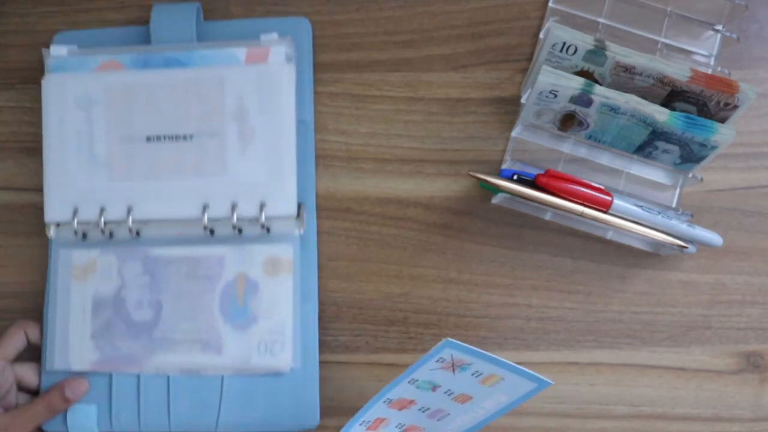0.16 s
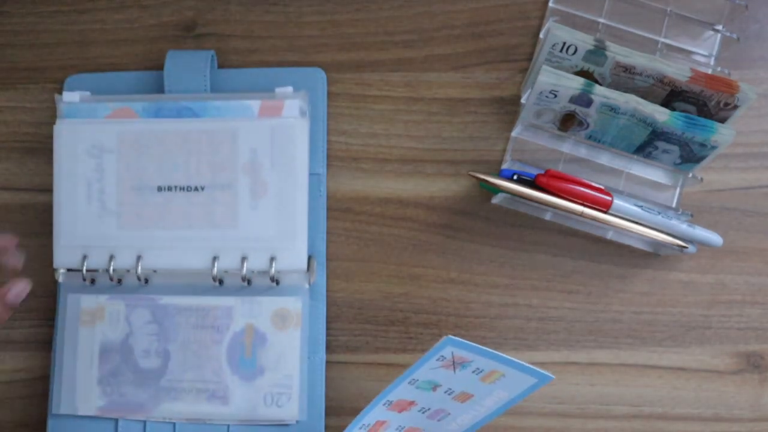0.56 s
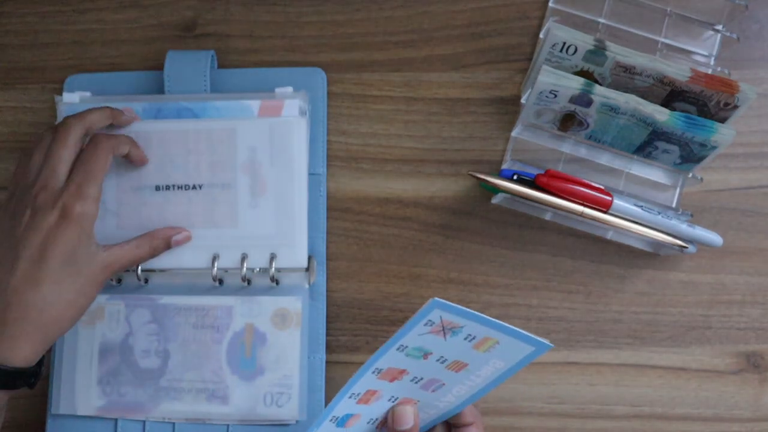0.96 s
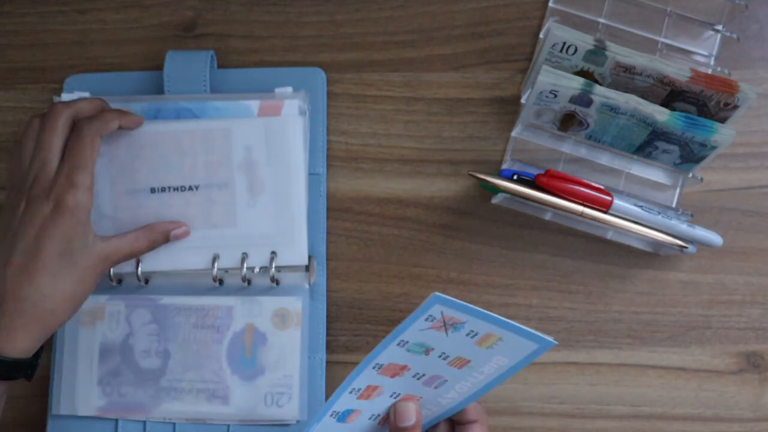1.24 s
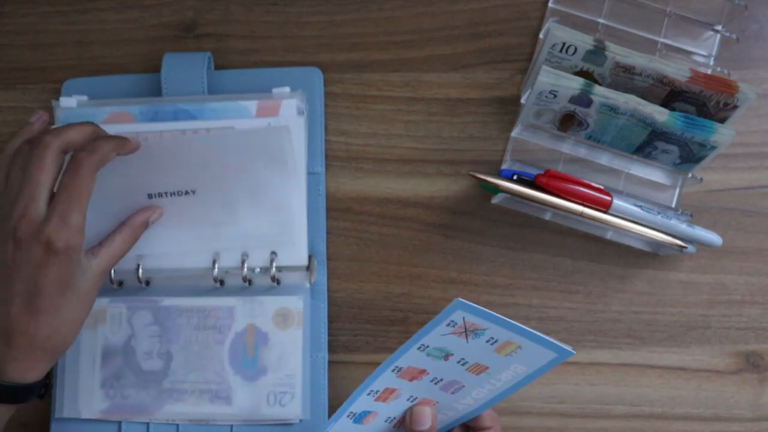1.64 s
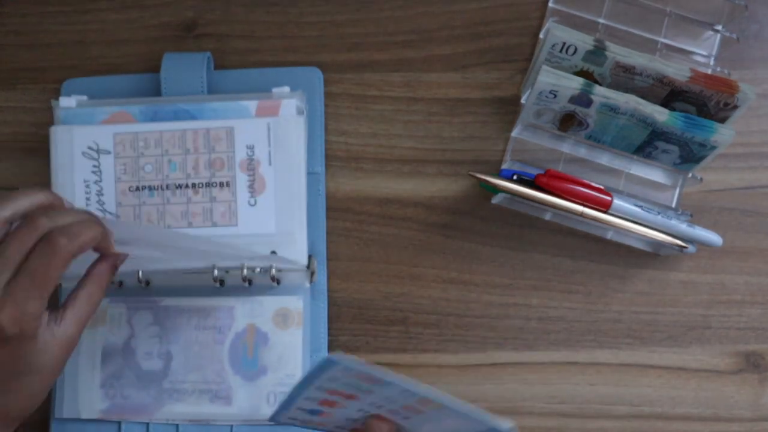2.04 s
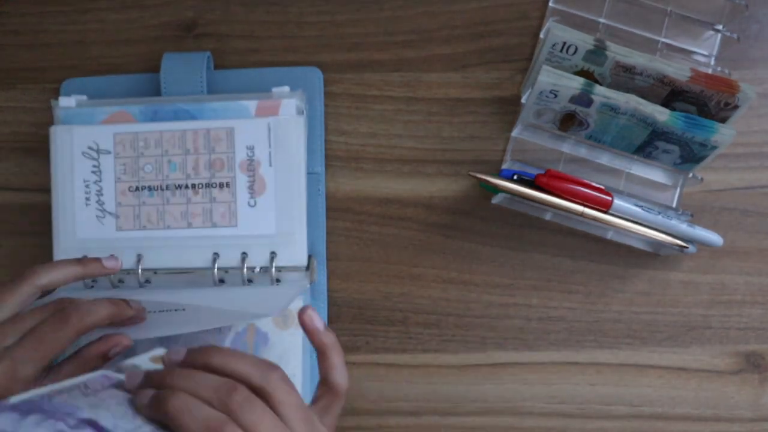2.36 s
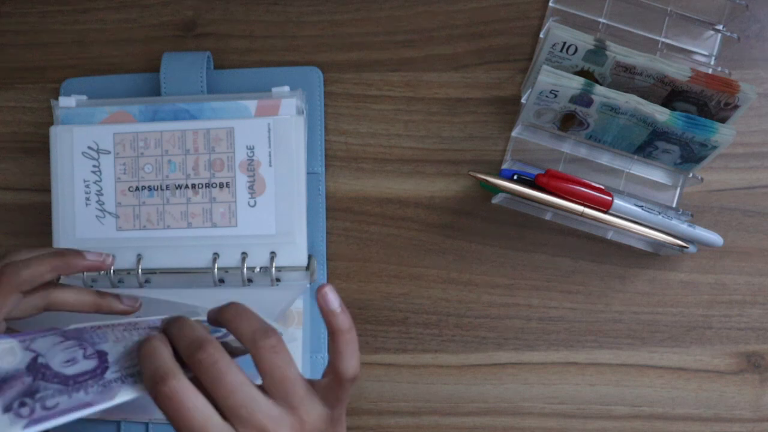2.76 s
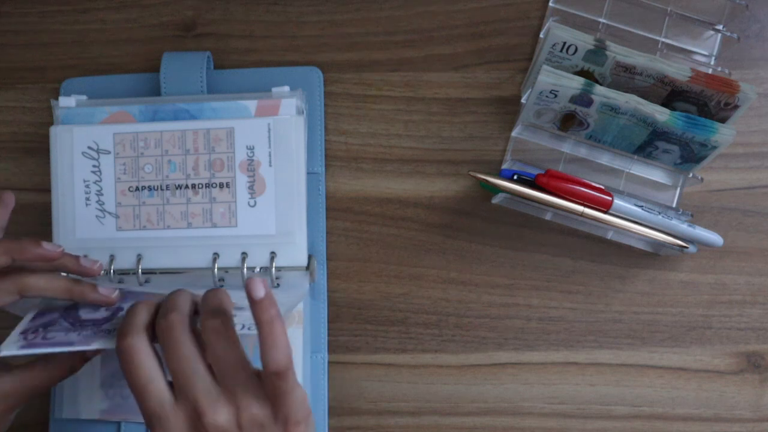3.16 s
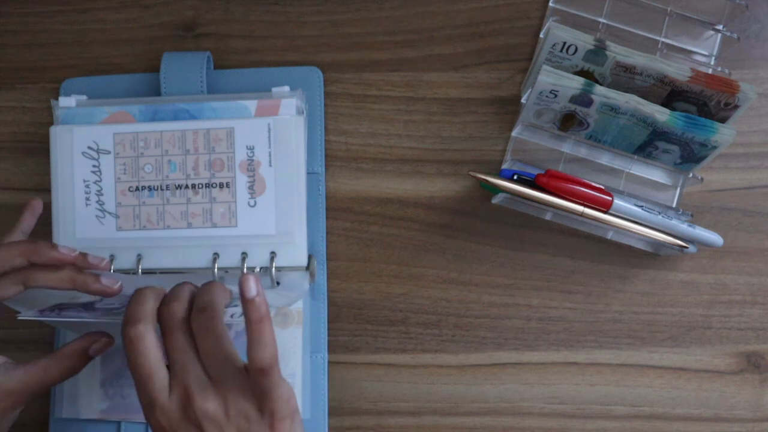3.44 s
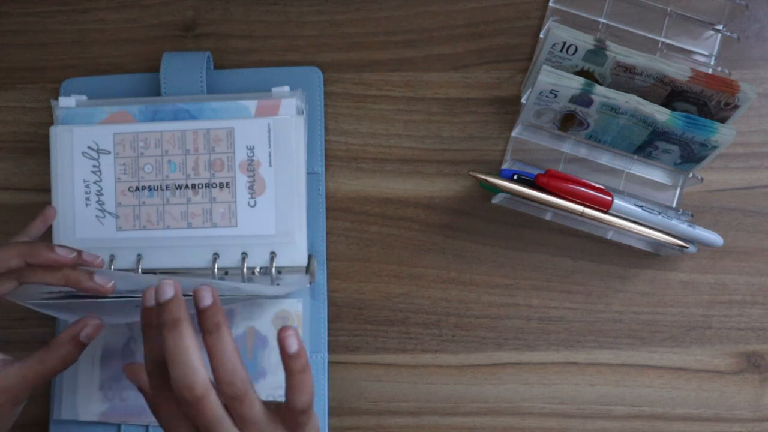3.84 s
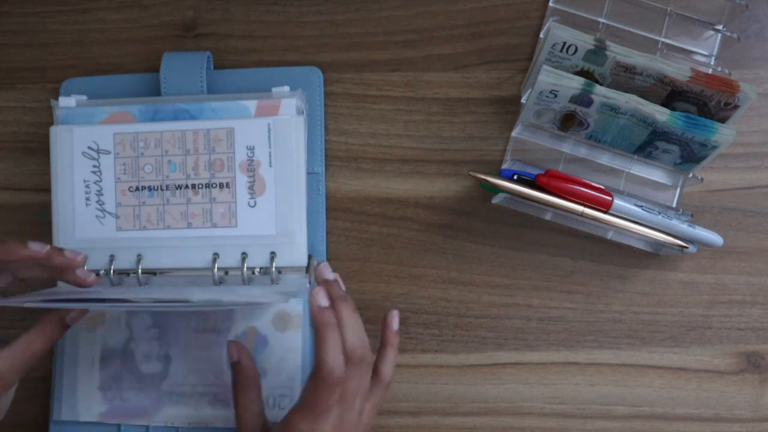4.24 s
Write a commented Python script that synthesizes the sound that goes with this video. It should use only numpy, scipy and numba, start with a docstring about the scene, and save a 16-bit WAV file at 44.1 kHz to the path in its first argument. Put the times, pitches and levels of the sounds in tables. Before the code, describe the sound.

Short rough scrape on wood, near silence, then increasingly busy crinkling, slipping and sharp popping of thin plastic pages with soft desk bumps.

```python
"""Binder and plastic sleeves on a desk

A ring binder scrapes over a wooden desk as clustered friction noise; then fingers work through its sleeves.
Sheets drag in short slips of friction noise through a resonance, and folds snap as short noise bursts.
Narrow noise bands squeak, bumps ring the desk modes, and the desk hums, rumbles and rubs as filtered noise.
Two nearby microphone ports hear this with room reverberation and random echoes, over a quiet noise floor."""
import sys
import numpy as np
from scipy import signal
from scipy.fft import rfft, irfft, next_fast_len
from scipy.io import wavfile
from scipy.ndimage import uniform_filter1d
from numba import njit

SR = 44100
rng = np.random.default_rng(int(sys.argv[2]) if len(sys.argv) > 2 else 0)


def elevation(decibels):
    """Turn decibel levels (scalar or array-like) into linear amplitude ratios."""
    levels = np.asarray(decibels, float)
    return 10 ** (levels / 20)


def unload_audio(sound):
    """Save the sound as a 16-bit wav file, at the path given as the first command line argument."""
    columns = np.transpose(np.atleast_2d(sound))
    # keep every value between -1 and 1, then stretch to whole-number steps
    steps = np.round(np.clip(columns, -1, 1) * 32767)
    wavfile.write(sys.argv[1], SR, steps.astype(np.int16))


N = 193951
T = np.arange(N) / SR

# All source levels hold ahead of space().
# Spectrum of the noise floor: frequency_hz, relative_density_db
FLOOR_SPECTRUM = [(18, -52), (30, -4.5), (140, -15), (243, -14), (332, -18), (639, -14.5), (691, -7),
                  (874, -18), (1080, -5.5), (1260, -14.5), (15500, -27)]
FLOOR_DB = -59.5
# Left-right correlation of the noise floor, limited on use: frequency_hz, correlation
FLOOR_CORRELATION = [(60, 1), (130, -1.2), (290, -1.8), (640, 0.086), (1410, -0.53), (3100, -0.31),
                     (6820, -0.13), (15000, -0.35)]

# Weight resting on the desk: time_s, hum_db, rumble_db, rub_db
DESK_LOAD = [(0.0, -73, -78, -60.5), (0.35, -63, -78, -52), (0.55, -62, -68, -57),
             (1.45, -69.5, -68.5, -64), (1.52, -51, -55.5, -59.5), (1.65, -75, -65, -62),
             (1.75, -59, -51.5, -53.5), (2.0, -58, -58, -66), (2.2, -56, -65, -63), (2.28, -58, -49, -39),
             (2.5, -56.5, -77, -61), (2.75, -59.5, -64, -59), (3.1, -58, -71, -55.5),
             (3.45, -52, -55, -56.5), (3.8, -58.5, -58, -54), (4.05, -58, -71, -60), (4.4, -62, -81, -63.5)]
# Desk modes: frequency_hz, width_hz, relative_level_db
DESK_MODES = [(135.2, 8.2, 2), (258, 42, 14), (397, 60, -12), (550, 98, 3), (790, 34, -14)]
# Hand or binder bumping the desk: time_s, push_drive_db, hum_drive_db, rub_drive_db
DESK_BUMPS = [(1.49, -31.5, -60, -50), (1.71, -29.5, -49, -50.5), (1.92, -35, -52, -38),
              (2.044, -33, -70, -55), (2.087, -20, -59, -35.5), (2.257, -18, -51, -55),
              (2.295, -21, -38.5, -43), (2.726, -34, -49, -36), (3.019, -52, -49, -46.5),
              (3.142, -43, -41, -38), (3.305, -26.5, -42, -48), (3.358, -48, -45, -54),
              (3.749, -33.5, -47.5, -44), (3.846, -43, -45, -51), (4.073, -29, -38.5, -38.5)]
BUMP_RUMBLE_DB = -12  # against the hum drive
# Rises are time constants
HUM_RISE_S, HUM_T60_S, RUB_RISE_S, RUB_T60_S = 0.005, 0.36, 0.0014, 0.18

# Binder pushed over the desk: time_s, level_db, treble_above_level_db
SLIDE_MOTION = [(0.0, -30.5, -7), (0.034, -27.5, -7), (0.108, -25, -5.5), (0.338, -32.5, -11),
                (0.47, -40, -7.5), (0.532, -58, 6), (0.62, -57, -21)]
# Spectrum of the scrape: frequency_hz, relative_density_db
SCRAPE_SPECTRUM = [(88, -63), (150, -43), (225, -55), (270, -53), (382, -20.5), (541, -16), (872, 0),
                   (1280, -6), (2430, -9.5), (2770, -7), (3090, -11), (3390, -7.5), (12000, -24.5),
                   (15600, -59), (22000, -120)]

# Squeaks of a rubbed sleeve: start_s, stop_s, start_level_db, pitch_hz
SLEEVE_SQUEAKS = [(1.81, 1.925, -48, 1880), (2.09, 2.187, -40.5, 757), (2.923, 2.95, -40, 2070),
                  (2.921, 2.95, -41.5, 805), (4.093, 4.13, -41, 2200), (4.16, 4.205, -42.5, 1350)]
SQUEAK_WIDTH_HZ, SQUEAK_FADE_DB = 90, -6.5

# Plastic buckling: time_s, pop_peak_db, ring_hz, tick_above_pop_db, crack_above_ring_db
FOLD_SNAPS = [(0.352, -25.5, 1070, -0.5, -17), (0.918, -42.5, 2010, 6, -24), (0.951, -38.5, 1550, -1, -1),
              (1.487, -38, 1110, -14, -21), (1.692, -32, 1850, 2, -7), (1.722, -26, 2890, -2.5, -5),
              (1.821, -17, 3080, -9, -13), (1.922, -21, 1010, -30, -5), (2.045, -27.5, 1140, -18, -3),
              (2.085, -16, 1600, -36, -23), (2.0892, -8.5, 1290, -36, -8.5), (2.258, -10.5, 1430, -26, -29),
              (2.263, -6, 1370, -8.5, -39), (2.473, -20.5, 2600, 0, -19), (2.477, -20, 2380, -8, -2),
              (2.626, -35, 2800, -32, -4), (2.672, -31, 2350, -29, -8), (2.691, -21, 3130, -9.5, 12),
              (2.727, -9, 1500, -14, -5.5), (2.735, -6, 2270, -30, -34), (2.981, -27.5, 2070, -5, -6),
              (3.008, -17.5, 4080, -2.5, -19), (3.029, -25.5, 1390, -16, -13), (3.065, -21, 1780, -31, -13),
              (3.296, -15.5, 1610, -25, -20), (3.305, -10.5, 1340, -34, -33),
              (3.546, -20.5, 1610, -24, -17), (3.75, -12.5, 3950, -15, 0), (3.795, -6.5, 2100, -20.5, 0),
              (3.836, -19.5, 1980, 6.5, -6), (3.8437, 5.5, 2350, -10.5, 16.5), (3.862, -24, 2000, -15, -2),
              (3.873, -19, 1660, -16, 1), (3.917, -16, 1360, -13, -9), (4.07, -9.5, 2050, -9, -17),
              (4.074, -6.5, 1940, -8.5, -7), (4.123, -32, 2060, -13, -22), (4.19, -29, 1340, -22, -10)]

# In the next four tables ring_hz is the centre about which the sheet resonance wanders.
# Faint shifting of sheets from the first row on: time_s, level_db, ring_hz, hiss_above_level_db
SHEET_RUSTLE = [(0.5, -53, 2010, -38), (0.94, -60, 2040, -27), (0.97, -54, 1590, 3), (1.1, -66, 700, -15),
                (1.3, -65.5, 1200, -5), (1.45, -52.5, 1880, -1), (1.5, -57, 600, -12),
                (1.63, -56, 1680, -0.5), (1.8, -53, 1900, -9), (1.94, -47.5, 880, 0.5),
                (2.1, -46, 800, 1.5), (2.45, -50, 2300, -6), (2.6, -59.5, 1500, -3),
                (2.85, -45.5, 1120, -10), (3.0, -48, 900, -8), (3.12, -58, 3000, -12),
                (3.26, -44, 1420, -9.5), (3.57, -49.5, 2200, -20), (3.61, -40.5, 2200, -12),
                (4.0, -43, 1660, -36), (4.2, -58, 1380, -6), (4.26, -52, 1340, -5), (4.4, -57, 1370, 5)]
# Slips that ease off and stop: start_s, stop_s, start_level_db, ring_hz, hiss_above_level_db
SHEET_SLIPS = [(1.688, 1.722, -41.5, 3190, -7), (1.721, 1.768, -37, 2800, -6.5),
               (1.809, 1.835, -37.5, 2920, -11), (1.855, 1.908, -45, 1890, -9),
               (2.096, 2.16, -41, 1500, -3), (2.17, 2.227, -44, 800, -5.5), (2.249, 2.287, -22, 1300, -24),
               (2.31, 2.413, -35, 2000, -11.5), (2.736, 2.796, -38, 1470, -11),
               (2.919, 2.942, -41, 1980, -8.5), (3.009, 3.052, -30, 1270, -19),
               (3.132, 3.191, -24.5, 1920, -7.5), (3.199, 3.235, -31.5, 1570, -20),
               (3.301, 3.327, -27.5, 1190, -12), (3.326, 3.381, -23, 1650, -14.5),
               (3.382, 3.543, -36, 2230, -8), (3.515, 3.547, -28.5, 1660, -31),
               (3.717, 3.785, -29, 1020, -13), (3.878, 3.93, -33.5, 4440, -11),
               (3.923, 3.986, -29, 2040, -14.5), (4.137, 4.195, -38.5, 1290, -6.5),
               (4.217, 4.245, -44, 1460, -9.5)]
SLIP_EASE_DB = -3
# Ever harder pulls until the sheet lets go: start_s, stop_s, stop_level_db, ring_hz, hiss_above_level_db
SHEET_PULLS = [(1.01, 1.088, -47, 2050, 3), (2.24, 2.248, -23.5, 3160, -5), (2.628, 2.752, -39, 3030, -26),
               (3.645, 3.714, -23.5, 1740, -21.5), (3.828, 3.884, -25.5, 2230, -5),
               (4.064, 4.135, -30, 2100, -17)]
PULL_SWELL_DB = 9
# Edges flicking past a finger: start_s, start_level_db, ring_hz, hiss_above_level_db
EDGE_FLICKS = [(2.292, -20, 2800, -16), (2.434, -33, 2370, -35), (2.476, -34, 2300, -20),
               (3.066, -27.5, 3000, -16), (3.792, -22, 2070, -11)]
FLICK_S, FLICK_FADE_DB = 0.034, -26
# Spectrum of a dragged sheet: frequency_hz, relative_density_db
SHEET_SPECTRUM = [(240, -36), (400, -41), (653, -5), (796, 0), (1150, -0.5), (1240, -3), (1590, 1.5),
                  (1740, -1), (3060, 1.5), (5150, -3), (7910, -12), (15500, -37)]

ROOM_T60_S, ROOM_DB = 0.33, -12.5  # room energy against the direct path
ECHO_DECAY_MS, ECHO_HOP_S, ECHO_DB = 1, 0.004, -2
SHARED_HZ, DIRECT_TREBLE_DB = 3000, -11  # lows below the corner reach both ports directly
RIGHT_LAG_MS, LEFT_OVER_RIGHT_DB = 0.075, 1.2


def unit(x):
    """Normalisation: scale a signal to rms 1."""
    return x / np.sqrt(np.mean(x ** 2))


def curve(table):
    """Linear interpolation: table columns after the time, sample by sample."""
    time_s, *columns = np.transpose(table)
    return [np.interp(T, time_s, column) for column in columns]


@njit
def svf(x, hz, width):
    """State-variable resonance: band-pass with moving centre and width, gain 1 at the centre."""
    y, band_state, low_state = np.empty(len(x)), 0., 0.
    for i in range(len(x)):
        g = np.tan(np.pi * hz[i] / SR)
        damping = width[i] / hz[i]
        v = (band_state + g * (x[i] - low_state)) / (1 + g * (g + damping))
        band_state = 2 * v - band_state
        low_state = low_state + 2 * g * v
        y[i] = damping * v
    return y


def band(x, hz, width):
    """Simple resonance: a fixed or moving centre and width."""
    return svf(x, hz + np.zeros(len(x)), width + np.zeros(len(x)))


def body(x, modes):
    """Modal superposition: a sum of resonances, neighbours in opposite sign."""
    return sum((-1) ** k * elevation(db) * band(x, hz, width) for k, (hz, width, db) in enumerate(modes))


def shape(x, points, gain):
    """Spectral filtering: a gain computed from (frequency, value) points on a log frequency axis."""
    size = next_fast_len(N)
    hz, value = np.transpose(points)
    log_hz = np.log(np.arange(size // 2 + 1) * SR / size + 1)  # 1 Hz offset avoids log 0
    response = gain(np.interp(log_hz, np.log(hz), value))
    return irfft(rfft(x, size) * response, size)[:N]


def treble(x, hz):
    """High-pass filtering: remove what lies below the corner."""
    return signal.sosfilt(signal.butter(3, hz, "high", fs=SR, output="sos"), x)


def grit(spread_db, hold_ms):
    """Stick-slip friction: tiny catches of very unequal size that come in clusters."""
    hold = max(int(hold_ms * SR / 1000), 2)
    held = np.repeat(np.minimum(rng.exponential(1, N // hold + 1), 3.5), hold)[:N]
    cluster = uniform_filter1d(held, hold)
    return unit(rng.standard_normal(N) * elevation(spread_db * cluster))


def crackle(per_s, spread_db):
    """Random impulses: creases let go one by one, a few clicks much larger than the rest."""
    chance = rng.random((2, N))
    size = elevation(-spread_db * np.log(np.maximum(chance[1], .02)))
    sign = np.sign(rng.standard_normal(N))
    return unit((chance[0] < per_s / SR) * size * sign)


def quiet():
    """Partial correlation: room tone and microphone hiss as a mid and side mix that varies with frequency."""
    mid, side = (shape(rng.standard_normal(N), FLOOR_SPECTRUM, elevation) for _ in range(2))
    mid = shape(mid, FLOOR_CORRELATION, lambda c: np.sqrt(1 + np.clip(c, -.9, .99)))
    side = shape(side, FLOOR_CORRELATION, lambda c: np.sqrt(1 - np.clip(c, -.9, .99)))
    return elevation(FLOOR_DB) * unit(np.array([mid + side, mid - side]))


def desk():
    """Modal excitation: weight sustains hum, rumble and rub; bumps knock the modes and stir all three."""
    hum_gain, rumble_gain, rub_gain = (elevation(db) for db in curve(DESK_LOAD))
    hum_hz = DESK_MODES[0][0]
    push, ring = np.zeros((2, N))
    for start, push_db, hum_db, rub_db in DESK_BUMPS:
        t = np.maximum(T - start, 0)
        hum_rise = 1 - np.exp(-t / HUM_RISE_S)
        rub_rise = 1 - np.exp(-t / RUB_RISE_S)
        hum_decay = 1000 ** (-t / HUM_T60_S)
        rub_decay = 1000 ** (-t / RUB_T60_S)
        push += elevation(push_db) * t / 0.0019 * np.exp(-t / 0.00061)
        ring += elevation(hum_db) * hum_rise * hum_decay * np.sqrt(2) * np.sin(2 * np.pi * hum_hz * t)
        rumble_gain = rumble_gain + elevation(hum_db + BUMP_RUMBLE_DB) * hum_rise * rub_decay
        rub_gain = rub_gain + elevation(rub_db) * rub_rise * rub_decay
    noise = rng.standard_normal((3, N))
    hum = unit(band(band(noise[0], hum_hz, 16.), hum_hz, 80.))
    rumble = unit(band(band(noise[1], 68.0, 44.0), 70.0, 62.0))
    rub = unit(band(band(noise[2], 353.0, 590.0), 353.0, 590.0))
    knock = elevation(8.5) * body(push + 1e-18, DESK_MODES)  # the offset keeps the filter state off denormals
    return hum_gain * hum + ring + rumble_gain * rumble + rub_gain * rub + knock


def slide():
    """Friction excitation: the cover scrapes on wood grain and rings the hollow under it."""
    db, treble_db = curve(SLIDE_MOTION)
    scrape = unit(shape(grit(spread_db=.4, hold_ms=4.), SCRAPE_SPECTRUM, elevation))
    hiss = unit(treble(grit(spread_db=.6, hold_ms=4.), 6000))
    stop = np.clip((SLIDE_MOTION[-1][0] - T) / 0.044, 0, 1)
    return elevation(db) * (scrape + elevation(treble_db) * hiss) * stop


def squeaks():
    """Narrow-band resonance: rubbing keeps one pocket of the sleeve sounding on a breathy pitch."""
    out, rub = np.zeros(N), grit(spread_db=1.0, hold_ms=3.7)
    for start, stop, db, hz in SLEEVE_SQUEAKS:
        edge = np.clip(np.minimum(T - start, stop - T) / .006, 0, 1)
        tone = unit(band(band(rub, hz, SQUEAK_WIDTH_HZ), hz, 3 * SQUEAK_WIDTH_HZ))
        progress = np.clip((T - start) / (stop - start), 0, 1)
        out += elevation(db + SQUEAK_FADE_DB * progress) * edge * tone
    return out


def snaps():
    """Buckling: a fold pops as a burst of a few ms in the bent sheet, with a tick on top."""
    out, t = np.zeros(N + 2048), np.arange(2048) / SR
    # a sharp crack, then the sheet flutters on
    fade = (1 - np.exp(-t / 0.00058)) * (np.exp(-t / 0.0023) + elevation(-7.5) * np.exp(-t / 0.0046))
    sharp = np.exp(-t / 0.0016) + elevation(-1)  # the brighter parts die sooner
    crack_filter = signal.butter(4, [1400, 5400], "band", fs=SR, output="sos")
    for start, db, ring_hz, tick_db, crack_db in FOLD_SNAPS:
        noise = rng.standard_normal((2, 2048))
        ring = band(noise[0] * fade, ring_hz, 0.41 * ring_hz)
        ring = band(ring, ring_hz, 2.94 * ring_hz)
        crack = signal.sosfilt(crack_filter, noise[0] * fade * sharp)
        pop = ring / np.abs(ring).max() + elevation(crack_db) * crack / np.abs(crack).max()
        tick = band(treble(noise[1] * fade * sharp, 5000), 7500., 9000.)
        burst = pop / np.abs(pop).max() + elevation(tick_db) * tick / np.abs(tick).max()
        first = int(start * SR)
        out[first:first + 2048] += elevation(db) * burst
    return out[:N]


def slips():
    """Stick-slip motion: drags set in and let go within ms; the bent sheet rings, its skin hisses above."""
    db, hz, hiss_db = curve(SHEET_RUSTLE)
    db = np.where(T < SHEET_RUSTLE[0][0], -90, db)
    drags = [(a, b, d, d + SLIP_EASE_DB, f, h) for a, b, d, f, h in SHEET_SLIPS]
    drags += [(a, b, d - PULL_SWELL_DB, d, f, h) for a, b, d, f, h in SHEET_PULLS]
    drags += [(a, a + FLICK_S, d, d + FLICK_FADE_DB, f, h) for a, d, f, h in EDGE_FLICKS]
    for start, stop, start_db, stop_db, ring_hz, skin_db in drags:
        ramp = np.interp(T, [start, stop], [start_db, stop_db])
        ramp = np.where((T >= start) & (T < stop), ramp, -np.inf)
        louder = ramp > db  # the louder motion takes over the sheet
        db = np.where(louder, ramp, db)
        hz = np.where(louder, ring_hz, hz)
        hiss_db = np.where(louder, skin_db, hiss_db)
    keep = np.exp(-1 / (0.0024 * SR))  # smoothing with a 2.4 ms time constant
    controls = (elevation(db), elevation(db + hiss_db), hz)
    gain, hiss_gain, hz = (signal.lfilter([1 - keep], [1, -keep], v) for v in controls)
    hz = np.maximum(hz, 300)
    drag = grit(spread_db=1.8, hold_ms=2.5) + elevation(-6) * crackle(per_s=700., spread_db=3.5)
    # the bend shifts under the fingers, so its ring wanders
    steps = np.repeat(rng.standard_normal(N // 800 + 1), 800)[:N]
    hz = hz * 2 ** (0.046 * uniform_filter1d(steps, size=300))
    bent = unit(band(drag, hz, .18 * hz))
    sheet = unit(elevation(-10) * bent + unit(shape(drag, SHEET_SPECTRUM, elevation)))
    skin = unit(treble(band(grit(spread_db=1.1, hold_ms=6.), 11500., 14000.), 6000))
    return gain * sheet + hiss_gain * skin


def random_echoes(x):
    """Decorrelation: short random echoes, redrawn every few ms, make the treble differ between the two ports."""
    hop, t = int(ECHO_HOP_S * SR), np.arange(128) / SR
    out, padded = np.zeros(N + 3 * hop + 128), np.pad(x, (hop, 2 * hop))
    fade = np.sqrt(np.hanning(2 * hop))
    for a in range(0, N + hop, hop):
        echo = rng.standard_normal(128) * np.exp(-1000 * t / ECHO_DECAY_MS)
        out[a:a + 2 * hop + 127] += np.convolve(padded[a:a + 2 * hop] * fade, echo / np.linalg.norm(echo))
    return out[hop:hop + N]


def space(x):
    """Spaced reception: two ports a few cm apart, the right one later; each gets its own room and echoes."""
    t = np.arange(SR) / SR
    lows = signal.sosfilt(signal.butter(1, SHARED_HZ, fs=SR, output="sos"), x)
    highs = x - lows
    near = lows + elevation(DIRECT_TREBLE_DB) * highs
    out = []
    for lag_ms, sign in ((0, 1), (RIGHT_LAG_MS, -1)):
        # fractional delay, centred 16 samples in and trimmed below
        direct = np.sinc(np.arange(SR) - 16 - lag_ms * SR / 1000) * (t < 40 / SR)
        room = band(rng.standard_normal(SR), 2400.0, 10200.0)
        room = room * 1000 ** (-t / ROOM_T60_S) * np.clip(t / 0.0099, 0, 1)
        path = direct + elevation(ROOM_DB) * room / np.linalg.norm(room)
        heard = signal.fftconvolve(near, path)[16:N + 16] + elevation(ECHO_DB) * random_echoes(highs)
        out.append(elevation(sign * LEFT_OVER_RIGHT_DB / 2) * heard)
    return np.array(out)


def scene():
    """Superposition: binder, sleeves and desk in their space, the noise floor underneath."""
    return space(desk() + slide() + squeaks() + snaps() + slips()) + quiet()


def low_pass(x):
    """Removes everything above the highest recorded frequency."""
    return signal.sosfilt(signal.butter(12, 15720, fs=SR, output="sos"), x)


def record(dry):
    """Amplitude limiting: anything beyond full scale is clipped."""
    mix = np.clip(dry, -1, 1)
    return low_pass(mix)


dry = scene()
out = record(dry)
unload_audio(out)
```